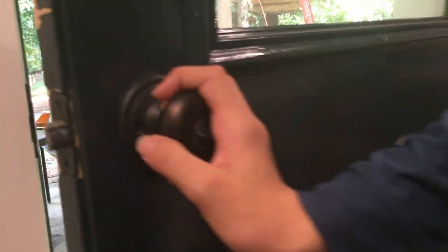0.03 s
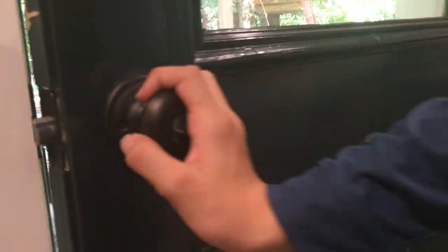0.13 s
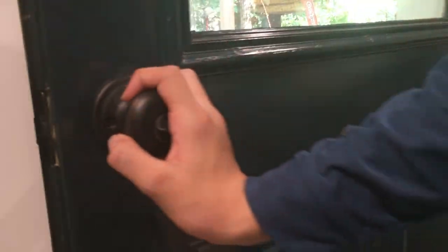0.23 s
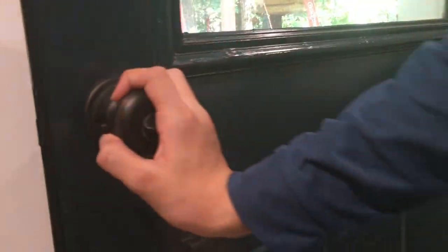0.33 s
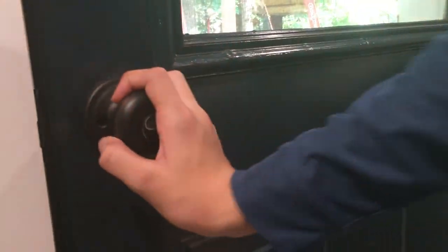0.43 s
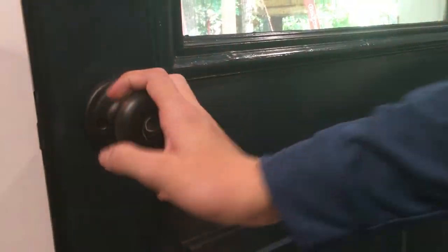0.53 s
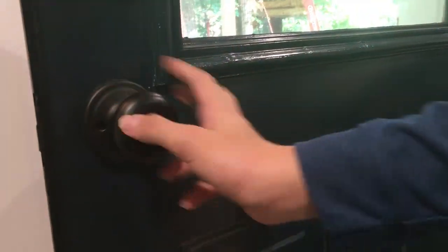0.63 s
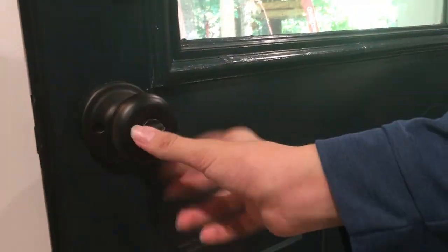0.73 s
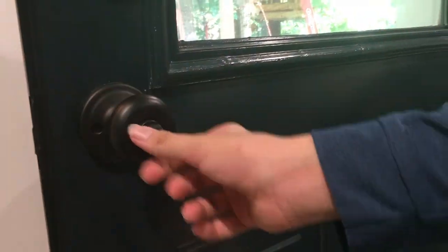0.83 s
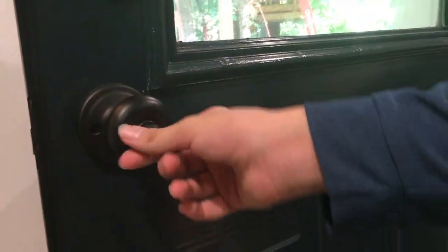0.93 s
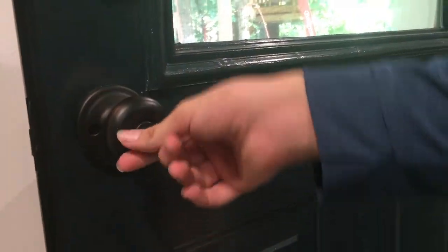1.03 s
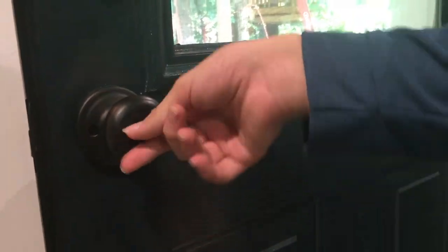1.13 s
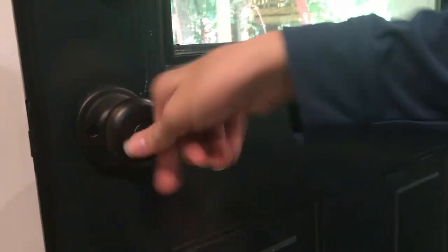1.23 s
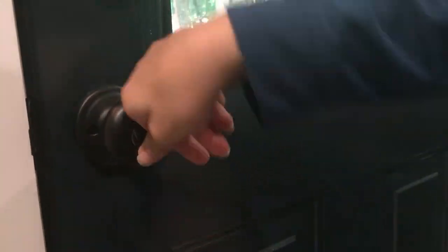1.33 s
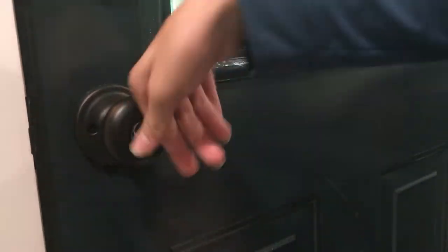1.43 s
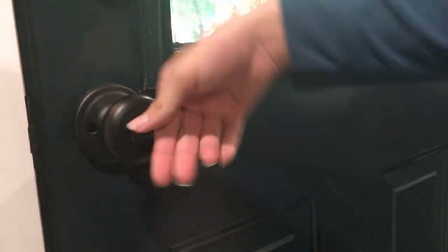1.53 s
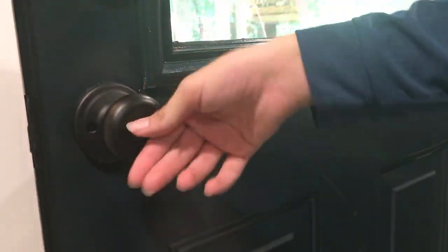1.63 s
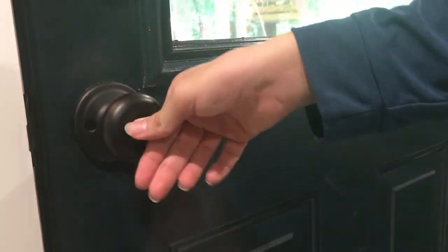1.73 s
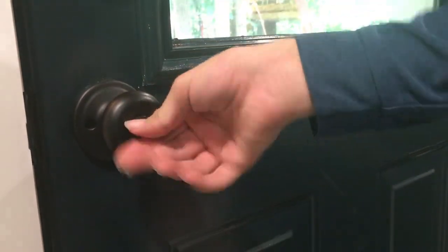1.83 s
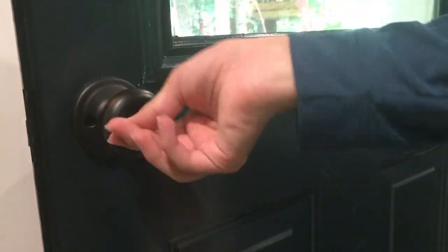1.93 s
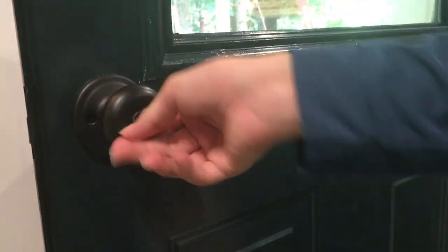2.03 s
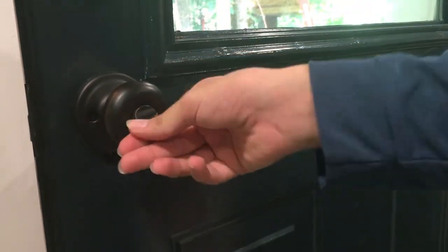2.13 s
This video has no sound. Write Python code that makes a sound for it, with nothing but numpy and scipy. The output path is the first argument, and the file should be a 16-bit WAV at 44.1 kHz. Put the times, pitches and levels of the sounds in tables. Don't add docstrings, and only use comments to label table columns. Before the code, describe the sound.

A heavy door closing: faint outdoor hiss fades by 0.15 s, the latch strikes the plate with bright clicks around 0.2 s, then snaps home loudest near 0.37 s with a short low boom and rattle until 0.5 s. Small ticks follow at 0.6 s. From 0.9 s a hand works the knob's lock: hollow knocks near 1.2, 1.3, 1.54 and 2.05 s, light rubbing, quiet short hallway, close small microphone.

```python
import sys
import numpy as np
from scipy import signal
from scipy.fft import rfft, irfft, next_fast_len
from scipy.io import wavfile
from scipy.ndimage import map_coordinates

SR = 44100
rng = np.random.default_rng(int(sys.argv[2]) if len(sys.argv) > 2 else 0)


def wrap_up_sound(samples):
    columns = np.atleast_2d(samples).T
    tamed = np.clip(columns, -1, 1)
    steps = np.round(tamed * 32767).astype(np.int16)
    wavfile.write(sys.argv[1], SR, steps)


def invert_db(level):
    return 10 ** (np.asarray(level, dtype=float) / 20)


N = 97020

# (frequency [Hz], density [dB per Hz])
INDOOR_AIR = [(25, -32), (55, -13), (220, -15), (650, -27.5), (1300, -31), (7000, -47), (10000, -34),
              (15500, -46.5)]
OUTDOOR_AIR = [(150, -8.5), (340, -12.5), (780, 0.5), (1000, -6), (5400, -28.5), (6800, -19.5), (8300, -28),
               (15000, -35.5)]
# (frequency [Hz], t60 [s])
HALL_DECAY = [(100, 0.5), (500, 0.41), (2500, 0.15), (10000, 0.23)]
# (start [s], length [s], centre [Hz], level [dB])
CREAKS = [(0.175, 0.019, 4200, -58), (0.202, 0.014, 6900, -49.5), (.352, 0.029, 6300, -48),
          (.582, 0.031, 12350, -57.5), (0.895, 0.034, 6180, -80), (1.03, 0.01, 2690, -77),
          (1.043, 0.019, 2770, -72.5), (1.072, 0.021, 2680, -73), (1.106, 0.02, 6300, -82.5),
          (1.126, 0.0149, 2810, -63), (1.888, 0.051, 3270, -80), (1.951, 0.085, 2600, -78.5),
          (1.876, .05, 13000, -81)]
# (start [s], length [s], hiss level [dB], scrape level [dB])
RUBS = [(0.165, 0.089, -88, -47.5), (0.249, 0.24, -89, -50), (0.43, 0.02, -44, -49),
        (0.569, 0.037, -61, -69), (0.683, 0.042, -76, -64.5), (1.027, 0.073, -79, -71.5),
        (1.11, 0.06, -77, -85), (1.285, 0.058, -78, -56), (1.427, 0.055, -79.5, -67),
        (1.525, 0.32, -84, -75), (1.736, 0.014, -67.5, -79), (1.858, 0.095, -66, -67.5),
        (1.925, 0.12, -69, -67), (2.052, 0.054, -71.5, -63.5)]
# (frequency [Hz], density [dB per Hz])
RUB_HISS = [(4800, -17.5), (6100, -2.5), (7600, -6.5), (10000, 5.5), (12500, -5), (15500, -20)]
RUB_SCRAPE = [(300, 7), (900, -3), (2600, -7), (3500, -17.5), (4500, -24)]
# (time [s], strength [dB], favoured frequency [Hz], share of free ring time [ratio])
THUMPS = [(.194, -30, 136, 0.81), (0.21, -38.5, 306, .5), (.25, -27, 148, 0.12), (0.295, -40, 169.5, 1.8),
          (.367, -15.5, 344, 0.44), (0.393, -23, 64, 0.78), (0.401, -22.5, 164.2, 1.1),
          (0.433, -26.5, 109, 0.9), (.462, -33, 199.4, 1.2), (.485, -31.5, 69.3, .7),
          (0.616, -37, 80.36, 0.5), (0.761, -54, 134, 1.57), (.9, -55.5, 135.5, 0.75),
          (1.142, -45.5, 356, 0.55), (1.143, -52.5, 143, .7), (1.219, -44, 115, 0.52),
          (1.213, -40, 515, 0.97), (1.229, -37.5, 241, 0.72), (1.317, -30.5, 538, 0.3),
          (1.331, -46, 200, 0.77), (1.38, -56, 300, 1.06), (1.541, -37, 526, 0.27),
          (1.541, -54, 110.2, 0.43), (1.641, -41, 450, 0.26), (1.661, -50, 295, 0.98),
          (1.882, -63.5, 484, 1.56), (1.97, -56.5, 301.5, 1), (2.063, -46.5, 360, 0.63),
          (2.079, -56, 79.5, 0.9), (2.085, -52, 204, 0.96)]
# (frequency [Hz], level [dB], t60 [s])
LEAF_MODES = [(51, -7, 0.2), (67.3, -0.5, 0.27), (92.2, -5, 0.31), (122, -8.5, 0.14), (131.94, -1, 0.24),
              (175.3, -6.5, 0.23), (244, -2.5, 0.18), (292.1, -1.5, 0.17), (367.2, 1, .15),
              (447, -2.5, 0.14), (519, 0, 0.17), (589.7, -3.5, 0.13), (674, -1.5, 0.2), (755, -16, 0.48)]
# (time [s], peak level [dB], centre [Hz], t60 [s])
KNOCKS = [(0.185, -19, 2680, 0.014), (0.1922, -23, 2000, 0.019), (.199, -42, 1800, 0.0089),
          (0.2119, -22, 2600, 0.025), (.2165, -30, 2000, 0.029), (0.226, -36.5, 2600, 0.013),
          (0.301, -35, 950, 0.033), (0.3667, -9, 1010, 0.021), (0.368, -7, 2000, 0.0088),
          (0.3797, -9, 2130, 0.036), (.3855, -24, 1527, 0.044), (.4015, -25.5, 1700, 0.013),
          (0.4242, -16, 2092, 0.0081), (0.43, -29, 3000, .01), (0.443, -27, 2000, 0.025),
          (0.8836, -48.5, 2470, 0.024), (1.014, -59, 2444, 0.015), (1.1194, -56, 2832, 0.022),
          (1.141, -42.5, 1050, 0.078), (1.211, -27, 1280, 0.016), (1.2285, -23.5, 1050, 0.016),
          (1.3143, -35.5, 1710, 0.035), (1.321, -32.5, 1240, 0.034), (1.463, -49, 1907, 0.034),
          (1.485, -53, 2178, 0.013), (1.5378, -39, 1840, 0.055), (1.544, -34.5, 1447, 0.027),
          (1.638, -43, 1098, 0.075), (1.827, -54.5, 1932, 0.017), (1.986, -48.5, 900, 0.053),
          (2.041, -37.5, 1905, 0.0088), (2.077, -44.5, 1760, 0.033), (2.092, -61, 2600, 0.0081)]
# (frequency [Hz], level [dB], t60 [s])
KNOB_MODES = [(1050, -2, 0.081), (1525, -8.5, 0.24), (1652, -2.5, 0.29), (2000, 1, 0.013), (2108, -7, 0.21),
              (2550, -7.5, 0.35), (3187, -4, 0.16)]
# (time [s], peak level [dB], centre [Hz], t60 [s])
TICKS = [(.1858, -18, 6900, 0.0042), (0.1905, -41, 9200, 0.0055), (.199, -46, 9000, 0.0046),
         (0.2112, -21, 5650, 0.024), (0.212, -10, 9860, 0.013), (.227, -35, 9130, 0.0071),
         (0.2503, -19, 7600, 0.0048), (0.3659, 3, 10870, 0.0048), (0.3796, -14, 7400, 0.021),
         (0.4318, -25, 9700, 0.014), (0.4364, -33, 11500, 0.0068), (0.484, -29.5, 8980, 0.0033),
         (0.6015, -27, 10800, 0.0077), (.645, -40, 10900, 0.0078), (.706, -54, 10950, 0.011),
         (0.8845, -39, 6120, 0.0028), (1.0156, -54.5, 9040, 0.0045), (1.2114, -38, 8400, 0.02),
         (1.219, -45, 9700, 0.017), (1.229, -28, 9160, 0.0048), (1.274, -38.5, 9600, 0.0063),
         (1.302, -52, 5760, 0.0093), (1.315, -42, 7500, .006), (1.432, -56.5, 6180, 0.0074),
         (1.466, -50.5, 7030, 0.0056), (1.5388, -47, 7120, 0.011), (1.622, -54, 10150, 0.01),
         (1.673, -52, 9500, .004), (1.687, -52.5, 10100, 0.0036), (1.729, -49, 11070, 0.0078),
         (1.7713, -56, 10200, 0.007), (1.859, -57, 9800, 0.0085), (2.0413, -35.5, 9420, 0.0094),
         (2.078, -52, 6500, 0.0073), (2.0854, -41.5, 10000, 0.0082), (2.183, -52, 9420, 0.0065)]
# (time [s], frequency [Hz], level [dB], t60 [s])
SINGING_PARTS = [
    (.646, 12900, -69.5, 0.058),
    (0.708, 6110, -65.5, 0.024),
    (0.8854, 6350, -47.5, 0.017),
    (1.318, 6410, -60, 0.07),
    (1.325, 1682, -53, 0.47),
    (1.544, 1535, -49, 0.3),
    (1.544, 1610, -44.5, 0.18),
    (0.367, 6350, -20.5, 0.014),
    (1.875, 13800, -80.5, 0.49),
]
# (centre [Hz], width [Hz], level [dB])
STEEL_RESONANCES = [(4750, 300, 1), (5360, 330, -0.5), (6500, 2400, -6.5), (7993, 200, -9), (9800, 640, -3),
                    (10870, 2100, -1)]
# (frequency [Hz], gain [dB])
MIC_RESPONSE = [(18, -24.5), (45, 4), (3500, 1), (4400, 2), (5600, 4.5), (10000, 2), (13000, -4.5),
                (15800, -11)]

RISE_S = 0.00044
TICK_OCTAVES, KNOCK_OCTAVES, LEAF_OCTAVES, CREAK_OCTAVES = 0.43, 0.65, 0.38, 0.15
HALL_DB = -8


def unit(x):
    return x / np.sqrt(np.mean(x ** 2) + 1e-20)


def along(points, hz):
    f, value = np.transpose(points)
    return np.interp(np.log(hz + 1), np.log(f + 1), value)


def filtered(x, response):
    size = next_fast_len(len(x) + 4096)
    spectrum = rfft(x, size) * response(np.fft.rfftfreq(size, 1 / SR))
    return irfft(spectrum, size)[:len(x)]


def noise(colour, size):
    return unit(filtered(rng.standard_normal(size), lambda hz: invert_db(along(colour, hz))))


def wobble(rate):
    knots = rng.standard_normal(int(N * rate / SR) + 4)
    return map_coordinates(knots, [np.arange(N) * rate / SR])


def add(track, s, x):
    part = track[round(s * SR):][:len(x)]
    part += x[:len(part)]


def bell(hz, centre_hz, octaves):
    return np.exp(-0.5 * (np.log2((hz + 1) / centre_hz) / octaves) ** 2)


def stroke(length_s):
    return np.minimum(1, 2.5 * np.hanning(round(length_s * SR)))


def burst(centre_hz, octaves, t60, t):
    shape = invert_db(-60 * t / t60) * (1 - np.exp(-t / RISE_S))
    rough = shape * np.sign(rng.standard_normal(len(t)))
    crack = filtered(rough, lambda hz: bell(hz, centre_hz, octaves))
    return 0.5 * crack * np.linalg.norm(shape) / np.linalg.norm(crack)


def ring(modes, gains, t, rise_s, share, flutter_db):
    hz, db, t60 = np.transpose(modes)[..., None]
    chance = rng.standard_normal((len(modes), 2)) * [0.007, 2]
    tones = np.sin(2 * np.pi * hz * (1 + chance[:, :1]) * t)
    waves = tones * invert_db(db + chance[:, 1:] - 60 * t / (t60 * share))
    knots = rng.standard_normal((len(modes), 24))
    flutter = np.array([np.interp(t * 30, np.arange(24), row) for row in knots])
    waves *= invert_db(flutter_db * flutter)
    return gains(hz[:, 0]) @ waves * (1 - np.exp(-t / rise_s))


def air():
    shut_s, closing_s = 0.15, 0.15
    gap = np.clip((shut_s - np.arange(N) / SR) / closing_s, 0, 1)
    indoors = invert_db(-67.5 + 0.45 * wobble(3.8) + 2.0 * wobble(55)) * noise(INDOOR_AIR, N)
    return indoors + gap * invert_db(-63.5) * noise(OUTDOOR_AIR, N)


def hall(x):
    hz, t, z = signal.stft(rng.standard_normal(SR // 2), SR, nperseg=256)
    decay = invert_db(-60 * t / along(HALL_DECAY, hz)[:, None])
    tail = signal.istft(z * decay, SR, nperseg=256)[1]
    delayed = np.pad(x, (130, 0))
    return signal.fftconvolve(delayed, tail / np.linalg.norm(tail))[:N]


def creaking():
    out = np.zeros(N)
    for s, length_s, hz, db in CREAKS:
        swell = stroke(length_s)
        chafe = filtered(rng.standard_normal(SR // 5), lambda f: bell(f, hz, CREAK_OCTAVES))
        add(out, s, invert_db(db) * swell * unit(chafe)[:len(swell)])
    return out


def grit():
    return invert_db(3.5 * np.clip(wobble(220), -3, 1.5) + 1.5 * wobble(31))


def rubbing():
    hiss, scrape = np.zeros(N), np.zeros(N)
    for s, length_s, hiss_db, scrape_db in RUBS:
        add(hiss, s, invert_db(hiss_db) * stroke(length_s))
        add(scrape, s, invert_db(scrape_db) * stroke(length_s))
    return hiss * grit() * noise(RUB_HISS, N) + scrape * grit() * noise(RUB_SCRAPE, N)


def leaf():
    out, t = np.zeros(N), np.arange(SR // 2) / SR
    for s, db, hz, share in THUMPS:
        boom = ring(LEAF_MODES, lambda f: bell(f, hz, LEAF_OCTAVES), t, 0.0037, share, flutter_db=3)
        add(out, s, invert_db(db) * boom)
    return out


def knob():
    out, t = np.zeros(N), np.arange(SR // 4) / SR
    for s, db, hz, t60 in KNOCKS:
        snap = burst(2600, KNOCK_OCTAVES, 0.0065, t)
        thud = burst(hz, KNOCK_OCTAVES, t60, t)
        shell = ring(KNOB_MODES, lambda f: bell(f, hz, KNOCK_OCTAVES), t, RISE_S, 0.84, flutter_db=4)
        echo = burst(0.63 * hz, 1, 0.4, t)
        add(out, s, invert_db(db) * (snap + thud + invert_db(-24) * shell + invert_db(-21.5) * echo))
    case_top_hz = 3621
    return filtered(out, lambda f: 1 / np.sqrt(1 + (f / case_top_hz) ** 20))


def steel():
    out, t = np.zeros(N), np.arange(SR // 4) / SR
    for s, db, hz, t60 in TICKS:
        tick = burst(hz, TICK_OCTAVES, t60, t)
        echo = burst(hz, TICK_OCTAVES * 2, 0.3, t)
        rattle = burst(hz, TICK_OCTAVES, 0.04, t)
        add(out, s, invert_db(db) * (tick + invert_db(-33) * echo + invert_db(-27) * rattle))
    for s, hz, db, t60 in SINGING_PARTS:
        drift = np.cumsum(rng.normal(0, 0.06, len(t)))
        add(out, s, invert_db(db - 60 * t / t60) * np.sin(2 * np.pi * hz * t + drift))

    def resonances(f):
        peaks = sum(invert_db(db) / (1 + 2j * (f - centre) / width) for centre, width, db in STEEL_RESONANCES)
        return invert_db(-8) + peaks

    return filtered(out, resonances)


def scene():
    mix = air()
    for part in (rubbing() + creaking(), leaf()):
        mix = mix + part + invert_db(HALL_DB) * hall(part)
    return (mix + knob() + steel())[None]


def roll_off(x):
    return signal.sosfilt(signal.butter(12, 17010, fs=SR, output="sos"), x)


def record(dry):
    top_hz = 16200
    coloured = filtered(dry[0], lambda hz: invert_db(along(MIC_RESPONSE, hz)) / (1 + (hz / top_hz) ** 60))
    return roll_off(coloured[None])


dry = scene()
out = record(dry)
wrap_up_sound(out)
```